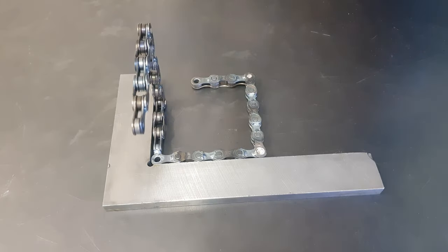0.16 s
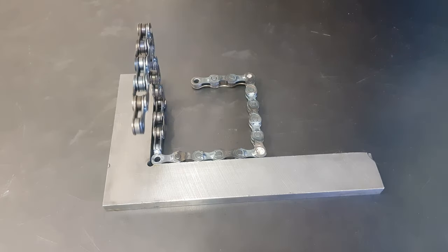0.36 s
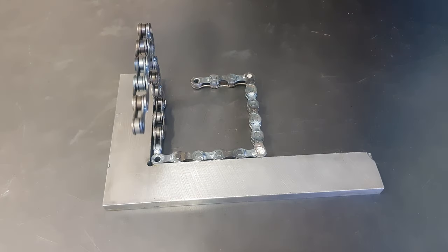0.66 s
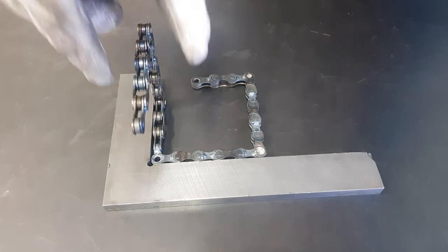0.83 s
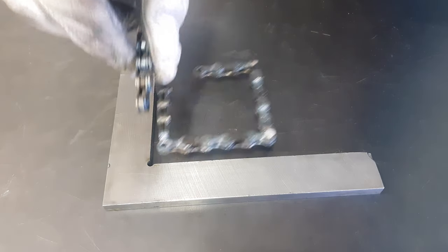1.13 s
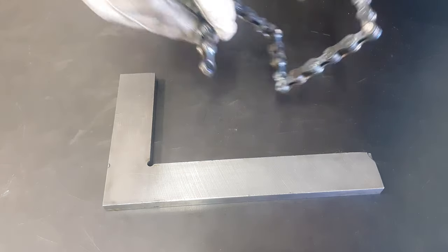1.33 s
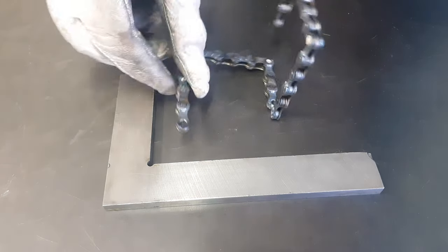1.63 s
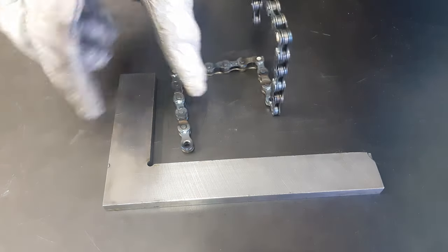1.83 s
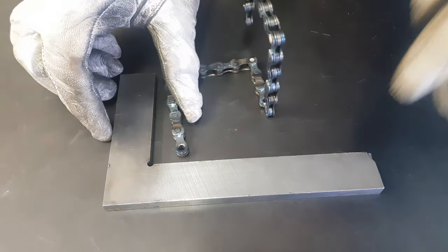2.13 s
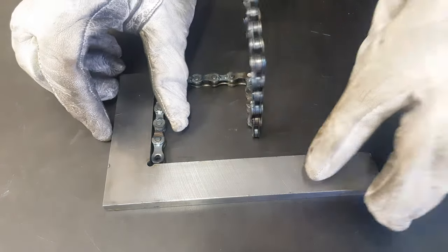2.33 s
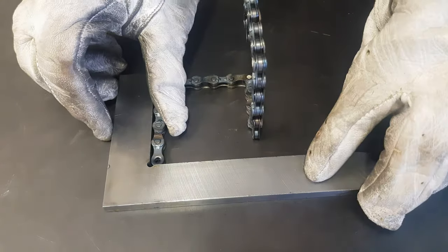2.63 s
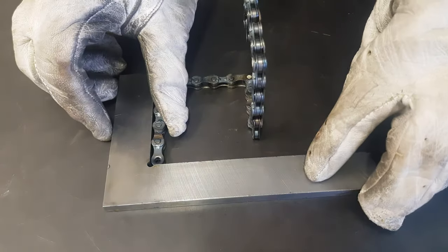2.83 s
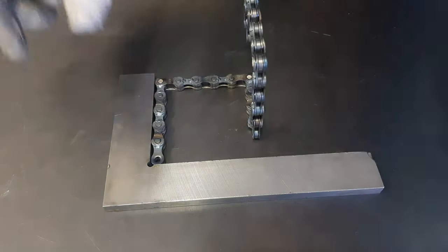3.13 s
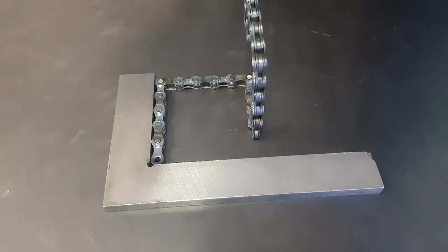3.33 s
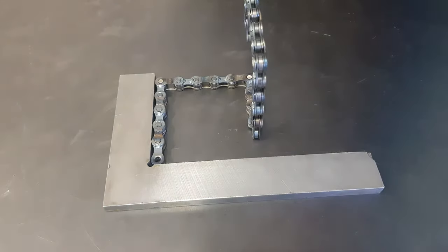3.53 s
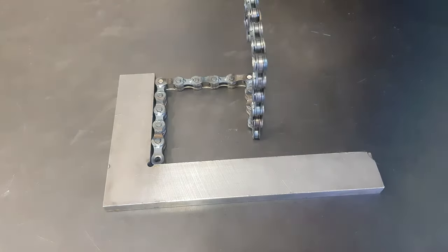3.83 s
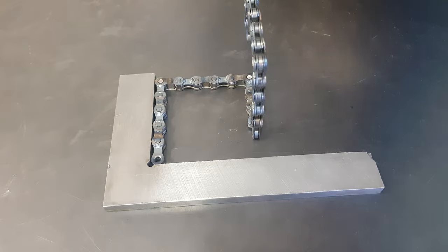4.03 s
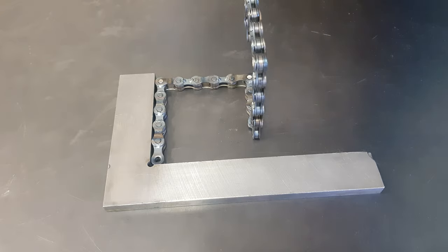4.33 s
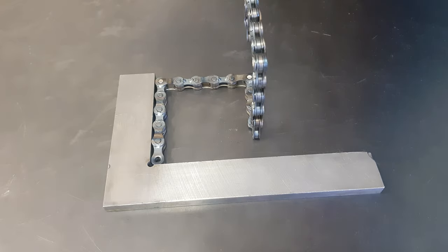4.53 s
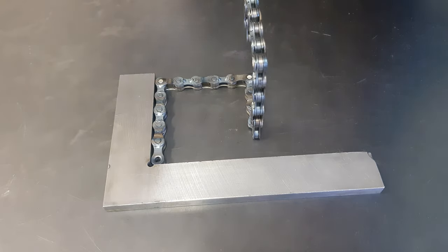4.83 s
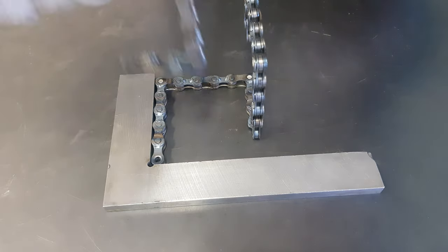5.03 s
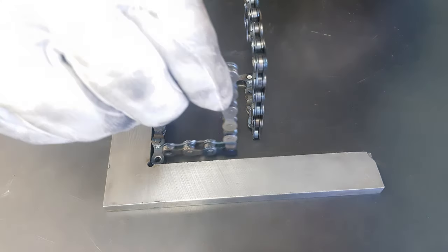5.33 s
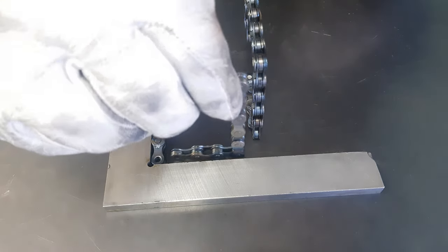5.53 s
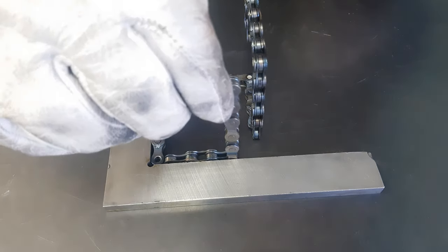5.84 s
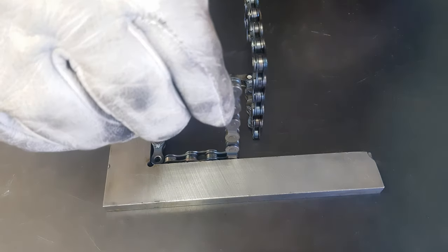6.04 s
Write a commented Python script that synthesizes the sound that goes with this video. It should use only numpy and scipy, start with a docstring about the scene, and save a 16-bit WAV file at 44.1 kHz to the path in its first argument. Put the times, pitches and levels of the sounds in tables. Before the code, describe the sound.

A quiet, hard-walled workshop with low rumble and faint hiss, heard close in stereo. A light chain tick comes at about 0.75 s and a barely audible touch near 1 s. At 1.4 s a heavy metallic knock with bench thud rings out, followed around 1.7 to 1.8 s by the loudest moment: a tight burst of bright, jangling clanks as the chain lands on steel, its reverberation fading over a second. From 2.0 to 2.45 s, softer rattles, scrapes and small rings. After a lull, thin bright clicks and short gritty slides occur at 3.5 to 3.9 s. Then mostly quiet, with faint ticks, soft hiss of a passing vehicle and wavering low hums from outside from about 3 s on. Light link ticks and a brief scrape gather from 5.3 s, ending with a crisp, fairly loud metal click at 5.7 s and its short ring.

```python
"""Roller chain on a steel bench

Gloved hands set welded roller chain down on a steel bench and push it against a steel square in a hard-walled
workshop. Knocks and slides are enveloped noise with reverberation; struck links, bench top and single parts
are damped sines. Rumble, a passing vehicle's tyre hiss and a background hiss, swelling with the room's ring
after the loud knocks, are shaped noise with set levels; the low hums from outside are wavering sines."""
import sys
import numpy as np
from scipy import signal
from scipy.fft import rfft, irfft
from scipy.io import wavfile

SR = 44100
rng = np.random.default_rng(int(sys.argv[2]) if len(sys.argv) > 2 else 0)


def output_pcm(signal):
    """Save a mono or channel-first signal as 16-bit PCM at the path in sys.argv[1].

    Samples are clipped to [-1, 1] before scaling.
    """
    pcm = np.clip(np.atleast_2d(signal).T, -1, 1) * 32767
    wavfile.write(sys.argv[1], SR, np.round(pcm).astype(np.int16))


N = 272097

# Chain knocks: start_s, links_level_db, bench_weight_db, plates_db and pin_treble_db (re links), rattle_t60_s
KNOCKS = [(0.751, -38.5, -4, -0.5, -4, 0.014), (0.9866, -56.5, 4.5, -9, -3, 0.042),
          (1.3926, -19.5, 4, -12, 1.5, 0.14), (1.4724, -26, 0.5, -3.5, -4.5, 0.15),
          (1.6883, -39.5, -5.5, -8, -6.5, 0.15), (1.713, -13, -1, -7, 3, 0.09),
          (1.7255, -22.5, -10, -2, -27, 0.077), (1.7572, -20, -2.5, -6, -3.5, 0.13),
          (1.7864, -21, -0.5, 0.5, -8, 0.015), (2.2037, -34, 2, 5.5, 0.5, 0.046),
          (2.227, -48.5, 5, -6, -7, 0.016), (2.2437, -40, 1.5, -14, 11, 0.016),
          (2.3038, -32.5, 0.5, -7, -0.5, 0.069), (2.3215, -33, -8.5, -15, -6, 0.076),
          (2.4209, -39, -3.5, -11, -7.5, 0.049), (2.859, -58, 8.5, -8.5, -8, 0.05),
          (3.2242, -54.5, -3.5, -10, -8, 0.023), (3.5068, -56, 0, 3, -14, 0.04),
          (3.533, -50.5, 0.5, 7, -7.5, 0.097), (3.649, -29, -16, -12, -3, 0.035),
          (3.667, -33, -19, -2, -2, 0.056), (3.777, -48, -1, -21, -21, 0.047),
          (4.3026, -55, -2, -5, -12, 0.059), (4.3255, -53.5, -5, -4, 5, 0.048),
          (4.623, -57, -2, -10, 5, 0.11), (4.815, -49, -6, -10, -5, 0.028), (5.0437, -61, 6, 1, 6, 0.05),
          (5.2944, -61, -10.5, -10, 4.5, 0.068), (5.3308, -59.5, -9.5, -18, 8, 0.04),
          (5.461, -44.5, -11, -16.5, 3.5, 0.11), (5.477, -48, -11, -11, -9, 0.021),
          (5.573, -48, 1.5, 1, 0, 0.1), (5.6086, -45, 0, -14, 9.5, 0.059), (5.6517, -51, -3, -7, 0, 0.033),
          (5.707, -24.5, 0, 4.5, -2.5, 0.059)]
# Chain slides: touch_s, hardest_s, links_level_db, swell_db_per_s, fade_db_per_s, bench_weight_db
SLIDES = [(0.758, 0.775, -67, 50, 68, 5), (0.955, 1.024, -78.5, 50, 202, 6.5),
          (2.018, 2.093, -50.5, 208, 250.5, 4.5), (2.167, 2.295, -48, 55, 184.5, 1.5),
          (3.534, 3.651, -37, 150.5, 133, -0.5), (3.695, 3.829, -44, 79, 704, 0),
          (3.77, 3.823, -47, 202, 500, -6), (3.86, 3.88, -59, 50, 35, 1.5),
          (3.986, 3.996, -49.5, 502, 698, 0.5), (4.328, 4.35, -72.5, 50, 35.5, 8),
          (4.557, 4.65, -71, 55, 54, 6.5), (4.838, 4.85, -70.5, 50, 29, 4.5),
          (5.494, 5.616, -57.5, 105, 350, -2)]
# Centres of the contact bands, thud, low mids, high mids, links, treble: centre_hz
CONTACT_HZ = [450, 1350, 3000, 6200, 11700]
# Knock of weight 0 dB, bench thud and low mids: level_db (re links)
KNOCK_BODY_DB = [-5, -6.5]
# Part of a knock's weight taken up by thud and low mids: share_db_per_db
KNOCK_SHARES = [1.8, 1]
# Slide of weight 0 dB, bench, low mids, high mids and treble: level_db (re links)
SLIDE_BODY_DB = [-5.5, -2.5, 1, -4.5]
# Part of a slide's weight taken up by the same four bands: share_db_per_db
SLIDE_SHARES = [1.9, 1.7, 0.14, .1]
# Chain colour and reverberation: frequency_hz, direct_db, reverberation_db, t60_s
ROOM = [(144, -14.5, -26.5, 0.93), (409, 4, -23, 1), (970, -1.05, -16, 0.46), (2640, -1.1, -22, 0.8),
        (3130, -6.5, -22.5, 0.71), (4400, -4.5, -24.5, .8), (5130, -6, -21.5, 0.53),
        (5740, -5, -19.5, 0.88), (7700, -1.5, -23, 0.38), (7900, -19.5, -26.5, 0.17),
        (11840, -3, -29, 0.57), (15300, -10.5, -28, 0.18)]
# Stereo width of the chain: frequency_hz, side_minus_mid_db
CHAIN_WIDTH = [(60, -20.5), (110, -11), (200, -15), (380, -15), (700, -2.5), (1290, 3), (2380, -1),
               (4400, 0), (8120, 0), (15000, 1.5)]
# Stereo balance of the chain: frequency_hz, left_minus_right_db
CHAIN_BALANCE = [(60, 0.0), (110, 10.5), (200, 13.5), (380, -0.5), (700, -2.5), (1290, -3), (2380, -1),
                 (4400, -4), (8120, 0.5), (15000, 1.5)]
# Modes of link plates and rollers, before detuning: nominal_hz, relative_db, longest_t60_s
LINK_MODES = [(1190, -4.5, .05), (2100, -11.5, .05), (2518, -3, 0.074), (3190, -0.5, 0.15),
              (3580, -8.5, 0.15), (5730, 0, 0.15), (5580, -7, 0.2), (6310, 0.5, 0.062), (6820, -7, 0.1),
              (7370, -14.5, .05), (7180, -3, 0.11), (10330, -0.5, 0.043), (10870, -10.5, .05),
              (13300, -8, .05), (14250, -12, .05)]
# Modes of the bench top: frequency_hz, relative_db, t60_s
BENCH_MODES = [(68.6, -13, 0.13), (213, -10.5, 0.085), (326, -18, 0.088), (405.3, -26, 0.099),
               (606.5, -8, 0.1), (1152, 2.5, 0.013)]
# Single parts ringing alone: start_s, pitch_hz, level_db, t60_s
PINGS = [(2.288, 1150, -37, .06), (2.335, 560, -42, .08), (4.327, 1200, -41, .015),
         (4.327, 1750, -41, .015), (5.331, 12900, -54, .04), (5.384, 5800, -66, .2),
         (5.609, 13500, -52, .25), (5.654, 10600, -54, .2)]
# Tyre hiss of a passing vehicle: time_s, level_db
PASSING = [(2.5, -84), (2.87, -78), (3.12, -69.5), (3.7, -70), (4.1, -60.5), (4.41, -69), (5.06, -61.5),
           (5.75, -63), (6.17, -65.5)]
# Swells of the four hums: peak_s, peak_db, width_s (standard deviation)
LOW_SWELLS = [(2.5, -59, .2), (3.129, -51.5, 0.14), (3.68, -48, 0.18), (4.28, -46, 0.19), (5.15, -56, 0.23),
              (5.9, -53.5, 0.5)]
EARLY_SWELLS = [(.6, -59.5, 0.21), (.97, -59, 0.104)]
LATE_SWELLS = [(3.3, -54, .35), (4.38, -52.5, 0.11), (4.78, -50, 0.058), (5.05, -52.5, .12),
               (5.36, -49.5, 0.086), (5.92, -54, 0.23)]
UPPER_SWELLS = [(3.001, -59.5, 0.27), (5.3, -55, .25), (5.95, -53.5, 0.083)]
# Tones of the four hums: mean_pitch_hz, octave_db (re fundamental)
LOW_HUM = (61.3, -32)
EARLY_HUM = (83, 0.6)
LATE_HUM = (105, -30)
UPPER_HUM = (128, -30)
# Low background: time_s, deep_rumble_db, rumble_db
RUMBLE = [(0, -52.5, -56.5), (.6, -58, -55.5), (1.3, -68, -55), (2.4, -63, -50), (3.2, -63.5, -53),
          (3.7, -60, -54.5), (4.6, -63, -54), (5.1, -57, -52.5), (6.17, -63, -54.5)]
# Upper background: time_s, hiss_db, treble_air_db
AMBIENCE = [(0, -65, -61.5), (.08, -65.5, -76.5), (.5, -61.5, -66), (1.2, -62.5, -74), (1.8, -46, -52),
            (2.2, -59.5, -69), (2.75, -60, -78), (2.95, -59.5, -67.5), (3.3, -57.5, -65.5), (4.2, -59, -73),
            (4.5, -60.5, -64.5), (4.8, -62.5, -65), (5.35, -63.5, -70.5), (5.8, -58, -68),
            (6.17, -66.5, -74.5)]
# Spectral shape of the workshop air, lower part: frequency_hz, relative_density_db (per Hz)
AIR_LOW = [(12, -36.5), (20, -23.5), (49, -2), (130, -2.5), (271, -9.5), (361, -17), (407, -17),
           (460, -17.5), (531, -20.5), (831, -21), (2600, -33), (3380, -74.5), (5720, -120)]
# Spectral shape of the workshop air, upper part: frequency_hz, relative_density_db (per Hz)
AIR_TOP = [(1060, -31.5), (1800, 0.5), (1990, -7.5), (2310, -6), (3320, -8), (6530, -6.5), (8620, -15),
           (9640, -10.5), (15000, -4), (16000, -9.5), (16500, -32)]
# Stereo width of the workshop air: frequency_hz, side_minus_mid_db
AIR_WIDTH = [(60, -10.5), (110, -14.5), (200, -13.5), (380, -4), (700, -2.5), (1290, 2.5), (2380, 0),
             (4400, -1.5), (8120, 2), (15000, -1.5)]

CREST_DB = 5.5   # a knock's nominal peak over its envelope
DEEP_SHARE, PIVOT_HZ = .3, 600   # extra share of a knock's weight per octave below the pivot
PASSING_HZ = 1818   # centre of the tyre-hiss resonance
HUM_WAVER, WAVER_HZ = 0.01218, 3.0   # rms pitch deviation as a fraction; corner of its drift
STOPBAND_HZ = 16974


def amp(db):
    """Level law: twenty decibels make a factor of ten in amplitude."""
    return 10 ** (np.asarray(db) / 20)


def rms_one(x):
    """Normalisation: a signal divided by its root mean square has unit rms."""
    return x / np.sqrt(np.mean(x ** 2) + 1e-20)


def in_time(rows, outside=None):
    """Linear interpolation: the columns of a time table are read at every sample."""
    s, *columns = np.transpose(rows)
    now = np.arange(N) / SR
    return np.array([np.interp(now, s, column, outside, outside) for column in columns])


def at_hz(points, hz):
    """Logarithmic interpolation: equal frequency ratios make equal steps along a spectrum table."""
    f, *columns = np.transpose(points)
    log_f = np.log(np.maximum(f, 1))
    return [np.interp(np.log(hz), log_f, column) for column in columns]


def band(x, low, high):
    """Band limitation: a Butterworth filter passes what lies between two frequencies."""
    sos = signal.butter(2, [low, high], "band", fs=SR, output="sos")
    return signal.sosfilt(sos, x)


def drift(rate_hz):
    """Smoothed chance: noise through two equal low-pass poles wanders slowly, here with unit rms."""
    step = 40   # samples between the values computed
    pole = np.exp(-2 * np.pi * step * rate_hz / SR)
    noise = rng.standard_normal(N // step + 2002)
    slow = signal.lfilter([1], [1, -2 * pole, pole * pole], noise)[2000:]   # without the filter's start
    return np.interp(np.arange(N) / step, np.arange(len(slow)), rms_one(slow))


def ring(x, hz, t60):
    """Damped resonance: a unit click excites a sine of initial height 1 that falls 60 dB in t60."""
    r = amp(-60 / (t60 * SR))
    w = 2 * np.pi * hz / SR
    return signal.lfilter([0, np.sin(w)], [1, -2 * r * np.cos(w), r * r], x + 1e-18)


def left_right(mid, side):
    """Mid-side principle: left is the sum, right the difference."""
    return np.array([mid + side, mid - side])


def coloured_noise(spectrum_db, side_db, size):
    """Spectral shaping: weighting the bins of white noise sets its colour and stereo width."""
    bins = rfft(rng.standard_normal((2, size))) * amp(spectrum_db)
    width = [np.ones_like(side_db), amp(side_db)]
    return left_right(*irfft(bins * width, size))


def knock_force():
    """Impact: a quick rise, a short hard crack and a longer exponential rattle in every contact band."""
    force = np.zeros((5, N))
    t = np.arange(SR // 4) / SR
    crack = 1.28 * amp(-60 * t / 0.016)   # the first contacts are the hardest
    rise = np.minimum(t / 0.0014, 1) ** 2
    for s, db, weight_db, plates_db, treble_db, t60 in KNOCKS:
        i = round(s * SR)
        rattle = amp(-60 * t / max(t60, .004))
        shape = ((rattle + crack) * rise)[:N - i]
        body_db = KNOCK_BODY_DB + weight_db * np.array(KNOCK_SHARES)
        colour_db = np.array([*body_db, plates_db, 0, treble_db])
        force[:, i:i + len(shape)] += amp(db - CREST_DB + colour_db)[:, None] * shape
    return force


def slide_force():
    """Stick-slip friction: a stroke swells and fades while its contacts judder at random."""
    force = np.zeros((5, N))
    now = np.arange(N) / SR
    for touch, hardest, db, swell, fade, weight_db in SLIDES:
        before_db = abs(swell) * (hardest - now)
        after_db = abs(fade) * (now - hardest)
        level_db = db - np.maximum(before_db, after_db)
        onset = np.clip((now - touch) / .008, 0, 1)
        stroke = onset * amp(np.maximum(level_db, -200))
        body_db = SLIDE_BODY_DB + weight_db * np.array(SLIDE_SHARES)
        colour_db = np.insert(body_db, 3, 0)   # links are the reference
        force += amp(colour_db)[:, None] * stroke
    # the links catch and let go, partly all at once, partly each band on its own
    together = drift(60)
    judder = np.array([amp(1.5 * together + 2.6 * drift(40)) for _ in CONTACT_HZ])
    return judder * force


def chain(force):
    """Contact noise and reverberation: uneven grit sounds by band; the walls store its power and let it decay."""
    out = np.zeros((2, N))
    # axes: alternating set, mid or side, sample; neighbouring bands get unrelated noise
    grit = rng.standard_normal((2, 2, N)) * amp(2.0 * np.minimum(rng.exponential(1, N), 4))
    grit = rms_one(grit)
    white = rng.standard_normal((2, 2, N))
    edges = 100 * (17000 / 100) ** np.linspace(0, 1, num=20) ** .6
    for k, (low, high) in enumerate(zip(edges, edges[1:])):
        hz = np.sqrt(low * high)
        weights = [np.interp(np.log(hz), np.log(CONTACT_HZ), unit) for unit in np.eye(5)]
        drive = np.array(weights) @ force
        direct_db, wet_db, t60 = at_hz(ROOM, hz)
        keep = amp(-120 / (t60 * SR))   # share of the stored power left after one sample
        spread = signal.lfilter([.01], [1, -keep], drive ** 2)
        stored = signal.lfilter([.002], [1, -.998], spread)   # reverberation builds up gradually
        direct = amp(direct_db) * drive * grit[k % 2]
        wet = amp(wet_db) * np.sqrt(stored + 1e-30) * white[k % 2]
        mid, side = band(direct + wet, low, high)
        side = amp(at_hz(CHAIN_WIDTH, hz)[0]) * side
        lean = at_hz(CHAIN_BALANCE, hz)[0] / 2
        out += 2.68 * amp([[lean], [-lean]]) * left_right(mid, side)
    return out


def clinks(force):
    """Modal excitation: random touches, scaled by the contact force, each ring one mode of one detuned link."""
    out = np.zeros((2, N))
    modes = 2 * LINK_MODES   # two links
    which = rng.integers(0, len(modes), N)
    happens = rng.random(N) < 2500 / SR   # 2500 touches per second on average
    touch = happens * amp(2.5 * np.minimum(rng.exponential(1, N), 4))
    touch = touch * rng.standard_normal((2, N))
    detune = rng.uniform(.95, 1.05, len(modes))
    for k, (hz, db, t60) in enumerate(modes):
        nearest = np.argmin(abs(np.log(hz / np.array(CONTACT_HZ))))
        clicks = amp(db - 11) * force[nearest] * touch * (which == k)
        out += ring(clicks, hz * detune[k], min(t60, .09))
    return out


def bench():
    """Modes of a struck plate: each knock rings every mode, and heavier blows favour the lower ones."""
    s, db, weight_db = np.transpose(KNOCKS)[:3]
    thud_db = db + KNOCK_BODY_DB[0] + KNOCK_SHARES[0] * weight_db
    out = np.zeros(N)
    scatter_db = 1.1 * rng.standard_normal((len(s), len(BENCH_MODES)))
    for k, (hz, mode_db, t60) in enumerate(BENCH_MODES):
        deep_db = DEEP_SHARE * weight_db * np.log2(PIVOT_HZ / hz)
        blows = np.zeros(N)
        blows[np.round(s * SR).astype(int)] = -amp(thud_db + mode_db + deep_db + scatter_db[:, k])
        out += ring(blows, hz, t60)
    return band(out, 54, 3000)


def single_rings():
    """Free vibration: a part struck once sounds one exponentially damped sine."""
    out = np.zeros(N)
    for s, hz, db, t60 in PINGS:
        click = np.zeros(N)
        click[round(s * SR)] = amp(db)
        out += ring(click, hz, t60)
    return out


def passing():
    """Band-limited tyre noise: a resonant ridge over a duller body follows the level of a passing vehicle."""
    white = rng.standard_normal((2, 2, N))
    ridge = band(white[0], PASSING_HZ - 170, PASSING_HZ + 170)
    body = band(band(white[1], 1000, PASSING_HZ), 500, PASSING_HZ)
    level = amp(in_time(PASSING, outside=-120)[0])
    return level * (rms_one(ridge) * 0.76 + rms_one(body) * 0.44)


def hum(tone, swells):
    """Frequency modulation: a sine and its octave share a wavering phase, heard in bell-shaped swells."""
    hz, octave_db = tone
    now = np.arange(N) / SR
    pitch_hz = hz * (1 + HUM_WAVER * drift(WAVER_HZ))
    turns = np.cumsum(pitch_hz) / SR + rng.random()
    level = sum(amp(db) * np.exp(-((now - s) / width) ** 2 / 2) for s, db, width in swells)
    wave = np.sin(2 * np.pi * turns) + amp(octave_db) * np.sin(4 * np.pi * turns)
    return np.sqrt(2) * level * wave   # the root makes swell levels rms levels of the fundamental


def background():
    """Superposition of noise bands: deep rumble, rumble, background hiss and treble air follow separate levels."""
    hz = np.maximum(np.arange(N // 2 + 1) * SR / N, 1)
    width_db = at_hz(AIR_WIDTH, hz)[0]
    low_db, top_db = at_hz(AIR_LOW, hz)[0], at_hz(AIR_TOP, hz)[0]
    rumble_air = coloured_noise(low_db, width_db, N)
    shared_air = coloured_noise(low_db, width_db, N)   # supplies both deep rumble and hiss
    top_air = coloured_noise(top_db, width_db, N)
    deep_db, rumble_db = in_time(RUMBLE)
    hiss_db, treble_db = in_time(AMBIENCE)
    deep = amp(deep_db) * rms_one(band(shared_air, 10, 47))
    rumble = amp(rumble_db) * rms_one(band(rumble_air, 44, 280))
    hiss = amp(hiss_db) * rms_one(band(shared_air, 300, 2000))
    treble = amp(treble_db) * rms_one(band(top_air, 2300, 17000))
    return deep + rumble + hiss + treble


def scene():
    """Linear superposition: chain, bench and single rings add to the hums and the background."""
    force = knock_force() + slide_force()
    near = chain(force) + clinks(force) + bench() + single_rings()
    hums = hum(LOW_HUM, LOW_SWELLS) + hum(EARLY_HUM, EARLY_SWELLS)
    hums = hums + hum(LATE_HUM, LATE_SWELLS) + hum(UPPER_HUM, UPPER_SWELLS)
    return near + passing() + hums + background()


def record(dry):
    """Low-pass filtering: a steep Chebyshev filter holds the top 90 dB down from the stopband edge."""
    sos = signal.cheby2(16, 90, STOPBAND_HZ, fs=SR, output="sos")
    return signal.sosfilt(sos, dry)


dry = scene()
out = record(dry)
output_pcm(out)
```